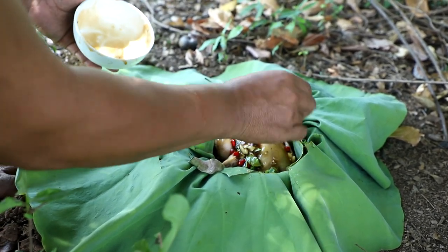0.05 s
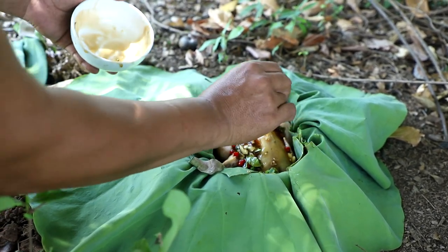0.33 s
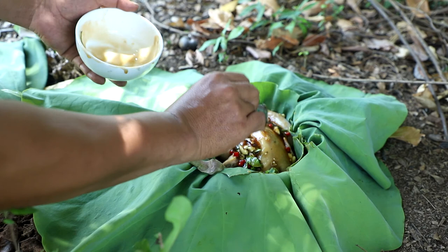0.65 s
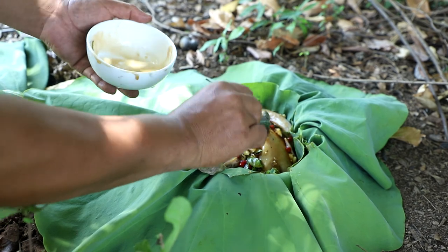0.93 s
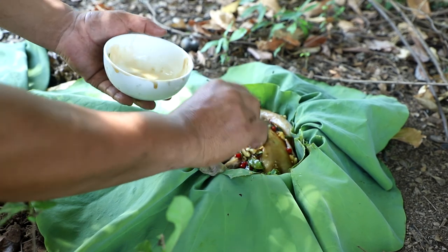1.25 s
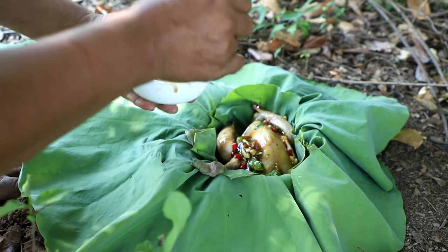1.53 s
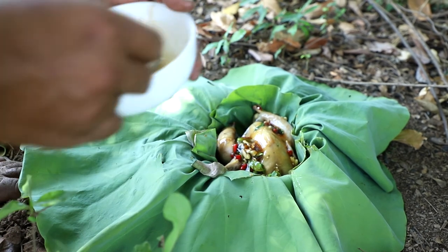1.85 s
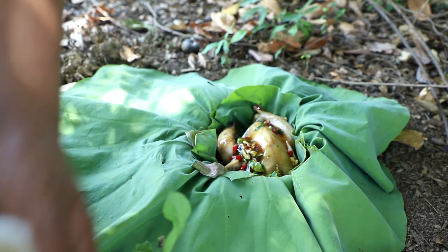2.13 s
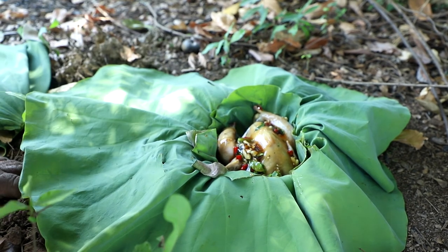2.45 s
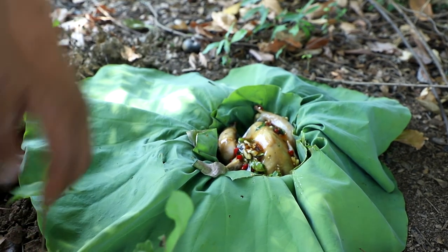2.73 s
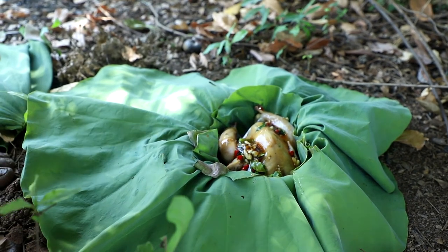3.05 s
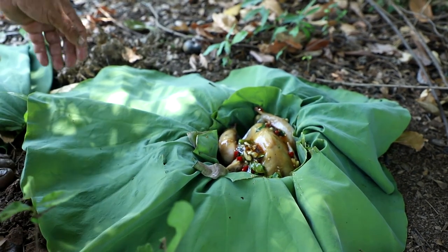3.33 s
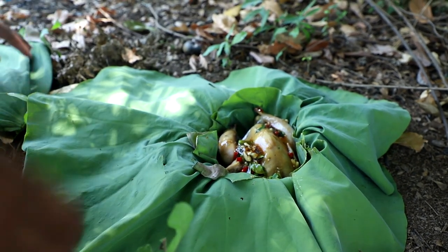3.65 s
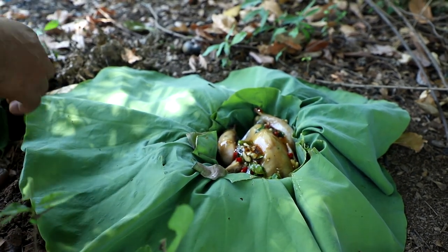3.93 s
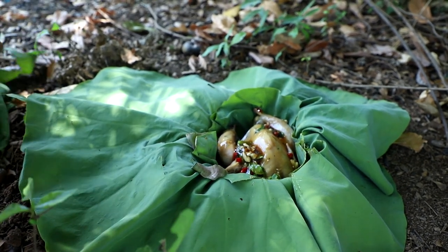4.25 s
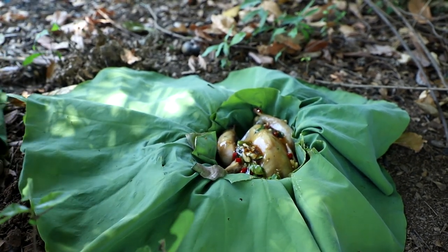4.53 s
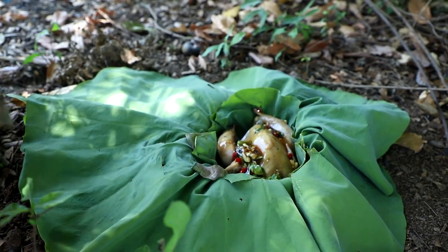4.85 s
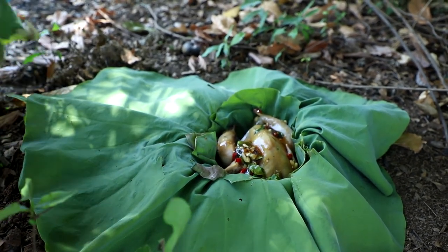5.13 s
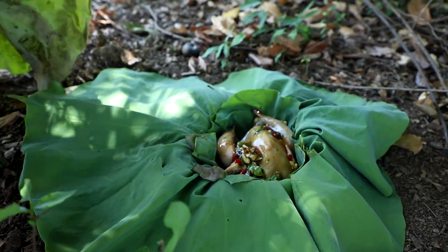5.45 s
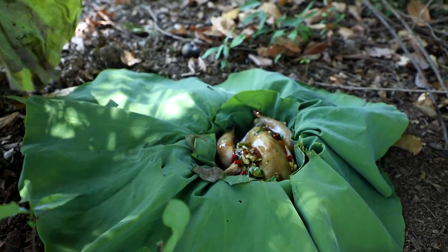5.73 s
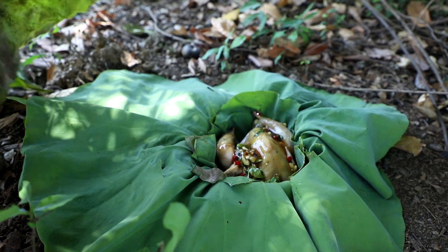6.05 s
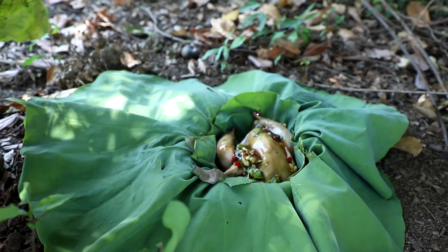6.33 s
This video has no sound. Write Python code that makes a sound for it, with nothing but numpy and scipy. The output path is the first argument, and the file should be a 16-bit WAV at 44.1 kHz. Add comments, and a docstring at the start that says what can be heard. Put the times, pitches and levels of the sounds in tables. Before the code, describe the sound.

Soft pats on meat, sharp ringing clinks of spoon and bowl, and rustling leaves, with faint birdsong behind.

```python
"""Seasoning a chicken in the forest

A spoon pats meat lying on big leaves, close to a stereo microphone: each pat is a damped thud.
Spoon and china bowl clink and scrape, ringing in their modes, as the bowl is carried off and put down.
Leaves and litter rustle and snap under hands and feet, and a fresh leaf is brought in.
Far birds call through the trees over a low rumble; a limiter ducks the loudest clinks."""
import sys
import numpy as np
from scipy import signal
from scipy.fft import rfft, irfft
from scipy.io import wavfile
from scipy.ndimage import uniform_filter1d, minimum_filter1d

SR = 44100
rng = np.random.default_rng(int(sys.argv[2]) if len(sys.argv) > 2 else 0)


def unload_audio(sound):
    """Save the sound as a 16-bit wav file, at the path given as the first command line argument."""
    columns = np.transpose(np.atleast_2d(sound))
    # keep every value between -1 and 1, then stretch to whole-number steps
    steps = np.round(np.clip(columns, -1, 1) * 32767)
    wavfile.write(sys.argv[1], SR, steps.astype(np.int16))


N = 286631

# spectrum of fine friction, on leaves and on glaze: f/Hz, relative level/dB
FRICTION_HISS = [(1800, -14), (3800, 2), (5500, 0), (8000, -3), (11000, -8.5), (15500, -17.5)]


def clinks(crack_t60=0.03, rise_s=0.0003, scatter_db=-27, scatter_t60=0.33):
    """Impact excitation: a blow cracks, sets spoon and bowl in free vibration and scatters off the ground."""
    # blows: t/s, clack level/dB, ring level/dB, place (0 rim, 1 base), crack level/dB
    blows = [(2.002, -39, -32, 0.23, -38), (2.026, -41, -32, 0, -40), (2.0672, -51, -27, 0, -34),
             (2.121, -37, -28.5, 0, -45.5), (2.130, -5.5, 8, 0, -6), (2.1453, -13, -26, 0.086, -24),
             (2.200, -35, -49, 0.8, -38), (2.373, -49, -27, 0.23, -52), (2.4334, 0, -25, 0.45, -11),
             (3.261, -39, -29, 0.9, -50), (3.309, -38, -36, 1, -52), (3.4842, 2.5, 4, 0.98, -8),
             (3.4995, -17, -33, 0.88, -16), (3.517, -19, -5, 0.71, -28), (3.608, -53, -42, 0.44, -51),
             (4.048, -47, -45, 1, -60)]
    # modes of the spoon: f/Hz, t60/s, level/dB, left-right/dB
    spoon_modes = [(1380, .025, -24, 4), (3000, .016, -10, 12), (3520, .014, -15, 0), (4760, .018, -7, 0),
                   (5000, .017, -1, -1), (5720, .012, -3, 2), (6080, .015, 0, 9), (7250, .012, -11, 7),
                   (9240, .018, -9, 9), (11400, .016, -21, 11)]
    # spectra: f/Hz, relative level/dB
    crack_shape = [(100, -44), (700, -10), (2000, -9.5), (4200, -1.5), (7000, 2.5),
                   (10000, -10), (15000, -16)]
    scatter_shape = [(300, -27), (1200, 1), (5500, 12), (9000, -14), (15000, -30)]
    out, t = np.zeros((2, N)), np.arange(SR // 3) / SR
    for s, clack_db, ring_db, place, crack_db in blows:
        noise = rng.standard_normal((2, len(t)))
        crack = colour(noise, crack_shape) * amp(-60 * t / crack_t60)
        scatter = colour(noise, scatter_shape) * amp(scatter_db - 60 * t / scatter_t60)
        china = amp(ring_db) * ring(bowl_modes(place), t, lag_s=0.00014, spread_rad=0.35)
        clack = amp(clack_db) * ring(spoon_modes, t, lag_s=0.00018, spread_rad=0.89)
        contact = amp(crack_db) * sides(1.7) * (crack + scatter)
        add(out, s, (clack + china + contact) * (1 - np.exp(-t / rise_s)))
    return out


def bowl_modes(place):
    """Mode shapes: the place struck decides how strongly each mode sounds, and to which side."""
    # natural frequencies of the bowl: f/Hz
    pitches = [1399, 2375, 3503, 3803, 4090, 4440, 4795, 4896, 5232, 5352, 5690, 6020, 6130, 6218, 6800,
               7300, 7722, 9271, 9439, 11430, 12210, 13450, 14350]
    # their modes: t60/s, level/dB struck at rim and at base, left-right/dB for rim and for base
    modes = [(0.22, -48, -27.5, 10, 9), (0.11, -52, -20, 8, 16), (0.12, -21, -6, -9, 2),
             (0.19, -44, -23.5, 0, -16.5), (0.106, -46.5, -33, -14, -7), (0.12, -48, -56, 7, 0),
             (0.034, -50, 2, 13, -7), (0.14, -21.5, -12.5, 2, 7), (0.095, -17, -43, 18, 3),
             (0.08, -44, -16, 6.5, -13), (0.12, -29, -41, 9.5, -9), (0.058, -31, -27, 21, 10),
             (0.105, -24, -29, 7, -3), (0.11, -23, -10.5, 16, 22), (0.17, -39, -44, 12, 8),
             (0.12, -34, -55, 14.5, 13.5), (0.12, -24.5, -42, 13, 4), (0.12, -31, -51, 1, 8.5),
             (0.11, -21.5, -22, 13, 8), (0.12, -29, -35, 17, 5), (0.16, -45, -77, 11, 12),
             (0.16, -47.5, -57, 13, 13), (0.065, -37, -53, 10.5, 6)]
    return [(hz, t60, (1 - place) * rim_db + place * base_db, (1 - place) * rim_pan + place * base_pan)
            for hz, (t60, rim_db, base_db, rim_pan, base_pan) in zip(pitches, modes)]


def scrapes(slips_per_s=2600, grit=0.097):
    """Stick-slip friction: dense tiny slips of the spoon on the glaze keep short resonances ringing."""
    # resonances damped by the hand: f/Hz, t60/s, level/dB, left-right/dB
    resonances = [(2520, 0.013, 4, 23), (3490, .04, -4, -8), (4270, 0.025, -4, 10), (4994, 0.033, 7, 5.5),
                  (6450, 0.028, 0.5, 5), (7710, 0.022, 1, 12), (8850, 0.015, -14, 10.5)]
    # slides: t/s of the hardest push, rise/s, fall/s, level/dB, tilt/(dB per octave)
    slides = [(2.03, .05, .06, -48, 5), (3.228, 0.0064, 0.025, -43.5, 13), (3.267, 0.012, 0.036, -31.5, -4)]
    out, t = np.zeros((2, N)), np.arange(SR // 16) / SR
    slips = rng.standard_normal(N) * (rng.random(N) < slips_per_s / SR)
    gritty = grit * colour(slips, FRICTION_HISS)
    lowest_hz = resonances[0][0]
    for s, rise, fall, db, tilt in slides:
        modes = [(hz, t60, d + tilt * np.log2(hz / lowest_hz), pan) for hz, t60, d, pan in resonances]
        body = ring(modes, t, lag_s=0.00015, spread_rad=0.38)
        scrape = unit(signal.oaconvolve(slips[None], body, axes=1)[:, :N])
        out += amp(db) * swell(s, rise, fall) * (scrape + gritty)
    return out


def pats(swell_s=0.003, damping_db_per_s=60 / 0.044, rebound_db=-27, rebound_s=0.0088):
    """Heavily damped impact: spoon on meat gives a hollow thud, a hard tick and a weak rebound."""
    # pats: t/s, level/dB, thud f/Hz, relative tick level/dB
    blows = [(0.515, -25.5, 535, -3.5), (0.6761, -21.5, 488, -25), (1.0209, -3, 514, -1.5),
             (1.191, -27, 450, -12), (1.3502, -27, 450, -8)]
    # modes of the spoon's tick: f/Hz, t60/s, level/dB
    tick_modes = [(1150, 0.012, -18), (1530, 0.013, -14), (1900, 0.0094, -19.5), (3700, 0.01, -21.5),
                  (5100, .014, -31), (5560, 0.0071, -21.5), (7050, 0.031, -29.5), (8570, 0.016, -26.5)]
    out, t = np.zeros((2, N)), np.arange(SR // 12) / SR
    for s, db, hz, tick_db in blows:
        envelope = (t / swell_s) * np.exp(1 - t / swell_s) * amp(-damping_db_per_s * t)
        thud = envelope * np.sin(2 * np.pi * hz * t)
        after = np.maximum(t - rebound_s, 0)
        rebound = amp(rebound_db - 60 * after / 0.035) * np.sin(2 * np.pi * hz * 1.22 * after)
        tick = ring([(*mode, 0) for mode in tick_modes], t, lag_s=-0.000043, spread_rad=0.24)
        tick *= 1 - np.exp(-t / 0.0004)
        add(out, s, amp(db) * (amp(-6) * sides(3) * (thud + rebound) + amp(tick_db) * tick))
    return out


def snaps(shared=0.46, rise_s=0.00042):
    """Buckling: a crease in a leaf or a twig gives way in a ragged burst of noise around one pitch."""
    # snaps: t/s, level/dB, centre f/Hz, t60/s
    bursts = [(0.088, -40, 290, 0.13), (2.478, -31, 1100, 0.22), (2.6428, -20, 6300, 0.0079),
              (2.921, -19.5, 1207, 0.02), (3.01, -24, 1780, 0.032), (3.104, -29, 310, 0.22),
              (3.116, -21.5, 1200, 0.027), (3.157, -19.5, 704, 0.033), (3.325, -18, 1570, 0.01),
              (3.93, -28.5, 1400, 0.02), (3.985, -32, 650, .03), (4.305, -24, 980, 0.035),
              (4.681, -29.5, 1000, 0.018), (5.151, -34.5, 8500, 0.017), (5.259, -34, 9000, 0.011),
              (5.429, -32.5, 604, 0.044), (5.563, -27.5, 2800, 0.011), (5.599, -28.5, 895, 0.024),
              (5.876, -36, 2040, 0.04), (6.135, -37.5, 4080, 0.056), (6.22, -28, 6100, 0.018),
              (6.242, -31, 8000, 0.022), (6.278, -23.5, 4500, 0.013), (6.2862, -27.5, 5400, 0.096),
              (6.344, -28.5, 4530, 0.038), (6.356, -28.5, 3400, 0.068), (6.3921, -17.5, 4080, 0.031),
              (6.406, -23.5, 1150, 0.036), (6.455, -18, 2380, 0.015), (6.466, -22.5, 5030, 0.045)]
    out, t = np.zeros((2, N)), np.arange(SR // 10) / SR
    for s, db, hz, t60 in bursts:
        common, left, right = rng.standard_normal((3, len(t))) * np.sqrt(rng.exponential(1, (3, len(t))))
        band = [(hz / 12, -18), (hz / 3, -5), (hz, 0), (hz * 2.17, -10), (hz * 14, -52)]
        burst = colour(shared * common + (1 - shared) * np.array([left, right]), band)
        envelope = amp(-60 * t / t60) * (1 - np.exp(-t / rise_s))
        add(out, s, amp(db - 6.5) * sides(3.3) * burst * envelope)
    return out


def leaves():
    """Superposition: the same movements drive a dull scuff, a crunch and a hiss of leaves and litter."""
    # spectra of scuff and crunch: f/Hz, relative level/dB
    scuff_shape = [(60, -35), (170, -2.5), (300, -1.5), (600, 6), (850, 5), (1200, -9.5), (2000, -34)]
    crunch_shape = [(400, -26.5), (800, -5.5), (1500, -2), (2400, -3), (4000, -13), (7000, -35)]
    scuff = rustle(scuff_shape, db=1.5, cracks_per_s=350, size_db=3.2, rub=1, clump_db=2.5, pan_db=2.5)
    crunch = rustle(crunch_shape, db=4, cracks_per_s=300, size_db=2.5, rub=0.87, clump_db=2, pan_db=2.5)
    hiss = rustle(FRICTION_HISS, db=3.5, cracks_per_s=500, size_db=3, rub=1.66, clump_db=1.5, pan_db=5.5)
    return (scuff * motion(layer=0, stir_db=-71) + crunch * motion(layer=1, stir_db=-62.5)
            + hiss * motion(layer=2, stir_db=-63.5))


def rustle(shape, db, cracks_per_s, size_db, rub, clump_db, pan_db):
    """Shot noise: tiny random cracks over the smooth noise of rubbing, swelling together in clumps."""
    clumps = amp(clump_db * drift(size=400))
    sizes = amp(size_db * np.minimum(rng.exponential(1, N), 4)) * rng.choice([-1, 1], N)
    impulses = sizes * (rng.random(N) < cracks_per_s / SR)
    t = np.arange(130) / SR
    smear = rng.standard_normal((2, len(t))) * np.exp(-t / 0.00059)
    smear = irfft(np.exp(1j * np.angle(rfft(smear))), len(t))  # all-pass: no pitch of its own
    cracks = signal.oaconvolve(impulses[None], smear, axes=1)[:, :N]
    return amp(db) * sides(pan_db) * colour((unit(cracks) + rub * stereo_noise()) * clumps, shape)


def motion(layer, stir_db, stir_full_s=1.7, stir_rise_s=0.37):
    """Incoherent addition: moves and a faint lasting stir sum in power to one rustle layer's gain."""
    # moves of hand or foot: peak t/s, rise/s, fall/s, level/dB of scuff, of crunch, of hiss
    moves = [(0.61, 0.021, .025, -70, -64, -59), (1.79, .12, 0.046, -62, -61.5, -67.5),
             (2.09, 0.14, 0.081, -58, -58, -55.5), (2.25, .06, 0.11, -62, -57.5, -66),
             (2.59, 0.037, 0.051, -47, -49, -65), (2.76, 0.15, 0.2, -48, -43.5, -47.5),
             (2.98, 0.04, 0.11, -41.5, -46.5, -52.5), (3.15, 0.067, 0.089, -41.5, -43.5, -53),
             (3.26, 0.057, 0.19, -61, -48.5, -63), (3.62, 0.028, 0.032, -64, -50.5, -62),
             (3.82, 0.035, 0.12, -74, -77, -55), (3.97, 0.11, 0.24, -54.5, -55, -59.5),
             (4.35, 0.048, 0.035, -55.5, -57, -51.5), (4.62, 0.053, 0.22, -67, -60.5, -61.5),
             (4.90, 0.095, 0.22, -60, -55, -53), (5.18, 0.045, .1, -62, -68, -62),
             (5.43, 0.024, 0.019, -66, -57.5, -52), (5.62, .08, .04, -60, -61, -59.5),
             (5.96, 0.093, 0.45, -61.5, -59.5, -62.5), (6.30, 0.1, 0.24, -62, -53.5, -53),
             (6.48, 0.062, .08, -52, -51, -44.5)]
    stir = amp(stir_db) * np.clip((np.arange(N) / SR - stir_full_s) / stir_rise_s + 1, 0, 1)
    power = sum((amp(levels[layer]) * swell(s, rise, fall)) ** 2 for s, rise, fall, *levels in moves)
    return np.sqrt(stir ** 2 + power)


def birds(direct=0.53, call_hz=3475, call_every_s=0.316, fade_db_per_s=0.36, hoot_every_s=0.148):
    """Distant sources: a repeated rising call, chirps and hoots arrive more scattered than direct."""
    # answering chirps: t/s, length/s, f/Hz, glide as a share of f, level/dB
    chirps = [(.438, 0.031, 4850, -.06, -61), (0.516, .06, 4730, -.2, -61), (0.742, 0.066, 3380, -.14, -63),
              (1.455, 0.05, 4370, 0.063, -61.5), (1.57, 0.027, 4650, -0.1, -55.5),
              (1.68, .05, 4230, -0.16, -62), (4.603, 0.068, 4680, -.07, -60),
              (4.715, 0.043, 2690, .03, -58), (5.074, 0.06, 2700, 0.049, -57.5),
              (5.883, 0.044, 2700, .02, -52)]
    out = np.zeros((2, N))
    for s in np.arange(-0.11, N / SR, call_every_s):
        hz = rng.normal(call_hz, 0.01 * call_hz)
        db = rng.normal(-58 - fade_db_per_s * s, 0.5)
        add(out, s, note(length_s=0.16, start_hz=hz, glide=0.19, db=db, bend=2.3, quaver=0.04))
    for s, *chirp in chirps:
        add(out, s, note(*chirp))
    for k, off_centre in enumerate(np.linspace(-1, 1, 5)):  # the middle hoot is loudest
        hoot = note(length_s=0.018, start_hz=990, glide=-0.073, db=-53.5 - 3 * off_centre ** 2)
        add(out, 1.16 + k * hoot_every_s, hoot)
    return direct * out + forest(out, t60=0.23)


def note(length_s, start_hz, glide, db, bend=1.41, quaver=0.033):
    """Frequency modulation: a bird's note is a quavering sine that swells, glides and fades."""
    progress = np.linspace(0, 1, int(length_s * SR))
    wobble = unit(uniform_filter1d(rng.standard_normal(SR), size=35))[:len(progress)]
    hz = start_hz * (1 + glide * progress ** bend) * (1 + quaver * wobble)
    tone = np.sin(2 * np.pi * np.cumsum(hz) / SR)
    return amp(db) * sides(0.85) * unit(np.sin(np.pi * progress) ** 2 * tone)


def forest(x, t60, echoes_per_s=2000, gap_s=0.006):
    """Scattering: trunks and leaves return sparse echoes that die away exponentially."""
    t = np.arange(SR // 2) / SR
    echoes = rng.standard_normal((2, len(t))) * (rng.random((2, len(t))) < echoes_per_s / SR)
    echoes *= amp(-60 * t / t60) * (t > gap_s)
    return signal.oaconvolve(x, echoes / np.linalg.norm(echoes[0]), axes=1)[:, :N]


def air(db=-47.5, crossover_hz=140, fall_db_per_s=1.1, sway_db=0.5, sway_s=0.075):
    """Ambient noise: a steady hiss, a low rumble that sways and slowly fades, and a wavering drone."""
    # spectrum of the open air: f/Hz, relative level/dB
    shape = [(18, -27), (32, -5.5), (55, 3.5), (80, -7.5), (130, -7), (234, -14), (319, -15), (624, -22),
             (1000, -22), (1500, -25), (3300, -25.5), (4810, -30), (8890, -36.5), (10500, -38.5),
             (16000, -49)]
    # its balance: f/Hz, left-right/dB
    balance = [(60, 1.5), (240, 2.5), (950, 1.5), (3770, -1), (15000, 3)]
    # tones of the drone: f/Hz, level/dB
    tones = [(50, -55), (92, -59.5)]
    hz = np.fft.rfftfreq(N, 1 / SR)
    pan_db = curve(balance, hz)
    spectrum = rfft(colour(stereo_noise(), shape)) * amp([pan_db / 2, -pan_db / 2])
    bass = 1 / (1 + (hz / crossover_hz) ** 4)
    rumble_db = 2.5 - fall_db_per_s * np.arange(N) / SR + sway_db * drift(size=int(sway_s * SR))
    rumble = irfft(spectrum * bass, N) * amp(rumble_db)
    hiss = irfft(spectrum * (1 - bass), N)
    drone = np.zeros(N)
    for tone_hz, tone_db in tones:
        phase = 2 * np.pi * np.cumsum(tone_hz + 250 * rng.standard_normal(N)) / SR
        drone += amp(tone_db) * np.sqrt(2) * np.sin(phase)
    return amp(db) * (hiss + rumble) + sides(3.4) * drone


def stereo_noise():
    """Spatial coherence: white noise, alike on both sides in the bass and unrelated in the treble."""
    # likeness of left and right: f/Hz, correlation
    coherence = [(60, 0.75), (150, 0.85), (380, 0.54), (950, 0.46), (2380, -0.1), (5980, -0.81),
                 (15000, 0.05)]
    left, independent = rfft(rng.standard_normal((2, N)))
    same = np.clip(curve(coherence, np.fft.rfftfreq(N, 1 / SR)), 0, 1)
    return irfft(np.array([left, same * left + np.sqrt(1 - same ** 2) * independent]), N)


def ring(modes, t, lag_s, spread_rad):
    """Free vibration: damped sines whose phase lags on the right by lag_s, varied by mode shape."""
    out = np.zeros((2, len(t)))
    for hz, t60, db, pan_db in modes:
        left_phase = rng.uniform(0, 2 * np.pi)
        lag_rad = 2 * np.pi * hz * lag_s + spread_rad * rng.standard_normal()
        phase = np.array([[left_phase], [left_phase - lag_rad]])
        out += sides(pan_db) * amp(db - 60 * t / t60) * np.sin(2 * np.pi * hz * t + phase)
    return out


def swell(peak_s, rise_s, fall_s):
    """Gaussian envelope of one movement, with separate widths for rise and fall."""
    t = np.arange(N) / SR - peak_s
    return np.exp(-np.minimum((t / np.where(t < 0, rise_s, fall_s)) ** 2, 30))


def drift(size):
    """Low-passed noise of rms 1, wandering over about size samples."""
    return unit(uniform_filter1d(uniform_filter1d(rng.standard_normal(N), size), size))


def colour(x, shape):
    """Zero-phase filtering by a spectrum (f/Hz, level/dB), scaled to rms 1."""
    hz = np.fft.rfftfreq(x.shape[-1], 1 / SR)
    return unit(irfft(rfft(x) * amp(curve(shape, hz)), x.shape[-1]))


def curve(points, hz):
    """Linear interpolation over log frequency."""
    f, value = np.transpose(points)
    return np.interp(np.log(hz + 1), np.log(f + 1), value)


def sides(pan_db):
    """Constant-power gains for a left-right level difference."""
    return unit(amp([[pan_db / 2], [-pan_db / 2]]))


def add(mix, s, sound):
    """Superposes a stereo sound on the mix at time s."""
    start = round(s * SR)
    sound = sound[:, max(-start, 0):]
    part = mix[:, max(start, 0):][:, :sound.shape[1]]
    part += sound[:, :part.shape[1]]


def amp(db):
    """Amplitude ratio of a level."""
    return 10 ** (np.asarray(db) / 20)


def unit(x):
    """Normalisation to rms 1."""
    return x / np.sqrt(np.mean(x ** 2) + 1e-20)


def scene():
    """Direct and scattered sound: bowl, spoon and leaves close by; birds and open air behind."""
    china = clinks() + scrapes()
    rustling = leaves()
    near = china + pats() + snaps()
    return near + amp(-24) * forest(near, t60=0.32) + rustling + birds() + air()


def record(dry, threshold_db=-13, share=0.55, attack_s=0.0027, hold_s=0.063, recover_db_per_s=195):
    """Limiting: the gain ducks by a share of the excess level; then clipping and a band limit."""
    pole = np.exp(-1 / (attack_s * SR))
    power_db = 10 * np.log10(signal.lfilter([1 - pole], [1, -pole], (dry ** 2).mean(0)) + 1e-12)
    excess_db = np.maximum(power_db - threshold_db, 0)
    half_hold = int(hold_s * SR) // 2
    held_db = -minimum_filter1d(-share * excess_db, 2 * half_hold + 1, origin=half_hold)
    recovery_db = recover_db_per_s * np.arange(N) / SR
    released_db = np.maximum.accumulate(held_db + recovery_db) - recovery_db
    duck_db = signal.lfilter([1 - pole], [1, -pole], released_db)
    clipped = np.clip(dry * amp(-duck_db), -1, 1)
    lowpass = signal.firwin(255, cutoff=15900, window=("kaiser", 8), fs=SR)
    return signal.oaconvolve(clipped, lowpass[None], "same")


dry = scene()
out = record(dry)
unload_audio(out)
```